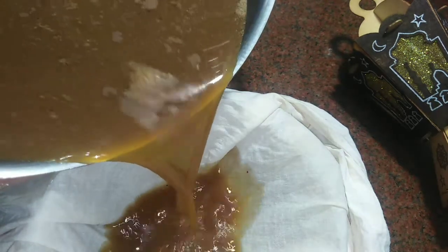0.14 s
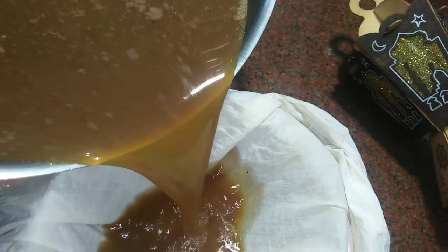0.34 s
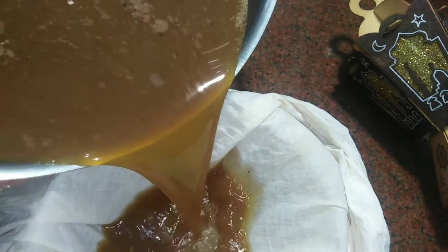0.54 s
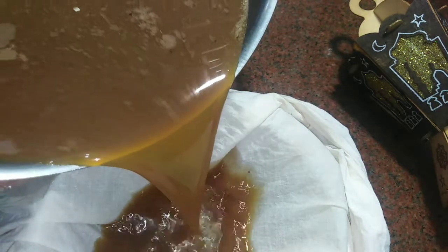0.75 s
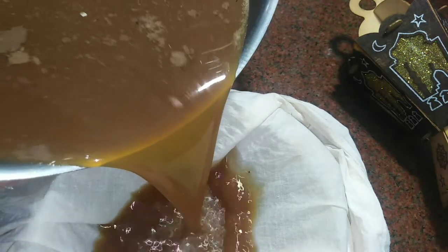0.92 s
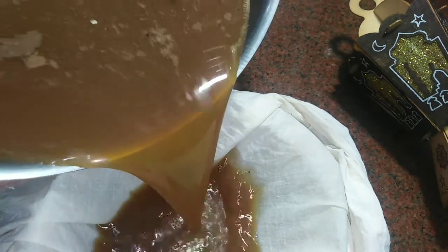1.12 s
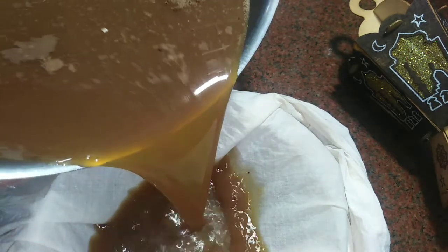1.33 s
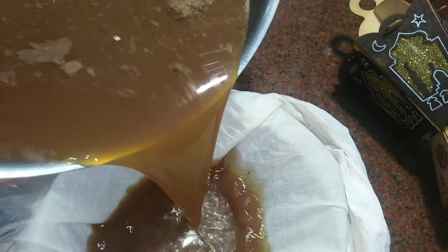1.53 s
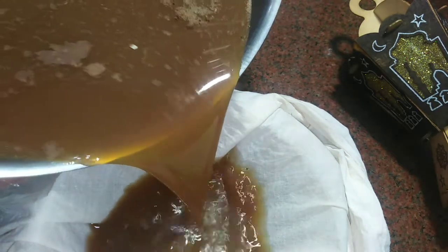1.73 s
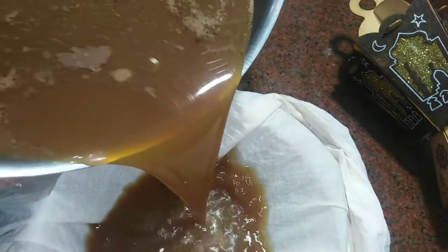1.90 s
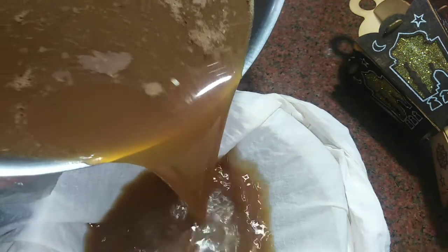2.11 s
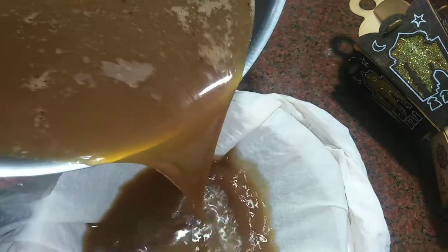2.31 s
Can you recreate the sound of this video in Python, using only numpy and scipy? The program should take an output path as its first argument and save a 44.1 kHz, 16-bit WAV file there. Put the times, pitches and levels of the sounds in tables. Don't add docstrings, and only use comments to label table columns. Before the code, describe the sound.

Syrup splatters brightly onto soaked cloth over a low motor hum, then only tiny drips remain.

```python
import sys
import numpy as np
from scipy import signal
from scipy.fft import rfft, irfft
from scipy.io import wavfile
from scipy.ndimage import uniform_filter1d

SR = 44100
rng = np.random.default_rng(int(sys.argv[2]) if len(sys.argv) > 2 else 0)


def ratio_of_db(decibels):
    return 10 ** (np.asarray(decibels, float) / 20)


def wrap_up_sound(samples):
    columns = np.atleast_2d(samples).T
    tamed = np.clip(columns, -1, 1)
    steps = np.round(tamed * 32767).astype(np.int16)
    wavfile.write(sys.argv[1], SR, steps)


N = 108530

# pitch_hz, level_db (per Hz)
AIR_COLOUR = [(560, -0.5), (800, -8), (1500, -15), (3200, -14.5), (8000, -18.5), (14000, -27.5),
              (15500, -26.5)]
# pitch_hz, likeness (0 to 1)
LIKENESS = [(60, 1), (240, 0.88), (950, 0.41), (3770, 0.074), (15000, 0.2)]
# pitch_hz, left_over_right_db
BASS_BALANCE = [(60, .2), (130, 1.9), (280, -2), (550, 2.3), (1200, .1)]
# start_s, length_s, level_db, pitch_hz
WHISTLES = [
    (.91, .06, -67, 2750),
    (1.065, .095, -68, 2600),
    (1.6, .16, -67, 3050),
    (1.765, .085, -66, 2380),
    (1.9, .15, -66, 2580),
    (2.06, .03, -62, 2300),
    (2.165, .17, -65, 2580),
]
# multiple (of the turning rate), level_db
HUM_LINES = [(4, -45.5), (5, -38.5), (8, -39.5), (10, -43.5), (12, -49.5), (13, -45.5), (16, -43),
             (20, -54.5), (24, -55.5)]
# pitch_hz, level_db (per Hz)
RUMBLE_COLOUR = [(20, -32), (50, -18), (63, -2.5), (100, 0.5), (290, -9), (490, -16.5), (540, -28.5),
                 (620, -37.5)]
# time_s, level_db
SPATTER_VIGOUR = [
    (0, -51),
    (.3, -35),
    (0.421, -44.5),
    (0.512, -33.5),
    (0.619, -74),
    (.9, -56.5),
    (1.05, -87),
    (1.9, -69.5),
    (2.059, -64),
    (2.46, -59.5),
]
# pitch_hz, level_db (per Hz)
SPATTER_COLOUR = [(1290, -46), (2200, -1.5), (7530, -6.5), (10800, -15), (14500, -10)]
# pitch_hz, left_over_right_db
POOL_SIDE = [(900, -10), (2000, -7), (3500, -3), (4600, -.1), (6500, -4)]
# start_s, level_db (peak), pitch_hz
FINE_POPS = [(0.0014, -23, 7530), (0.0115, -15.5, 8960), (0.066, -21, 10300), (0.1143, -18.5, 10760),
             (0.1406, -19, 8660), (0.1454, -23, 11000), (0.162, -26, 12000), (0.2119, -15.5, 11030),
             (0.2379, -23.5, 7810), (0.2494, -23, 7720), (0.2953, -17.5, 12440), (0.3029, -19.5, 7770),
             (0.3149, -19.5, 11020), (0.3304, -29, 7600), (0.348, -25, 11330), (0.379, -28, 8900),
             (0.5029, -23.5, 12120), (0.5117, -28.5, 10600), (0.6594, -27, 12000), (0.7668, -27.5, 10720),
             (0.8801, -22.5, 8210), (0.8914, -28, 11500), (0.9034, -26.5, 10500), (0.9105, -30.5, 12200),
             (0.9682, -29, 9630), (1.5464, -33, 7280), (1.714, -35, 14250), (1.8819, -26, 11400),
             (2.3622, -39, 11200)]
# start_s, level_db (peak), pitch_hz
FAINT_POPS = [
    (0.7417, -40, 11020),
    (0.844, -41.5, 11100),
    (1.0514, -39, 13830),
    (1.2186, -47.5, 13400),
    (1.291, -42, 14000),
    (1.73, -45, 7200),
    (2.0193, -44, 7260),
    (2.2084, -51, 9220),
    (2.2653, -47.5, 7460),
    (2.4544, -38.5, 7570),
]
# time_s, left_over_right_db (at 10 kHz)
BRIGHT_SIDE = [(0, -11), (.5, -12), (.7, -16), (2.4, -22)]
# start_s, level_db (peak), pitch_hz
MID_POPS = [(0.064, -26, 7100), (0.1842, -30, 5340), (0.2308, -31, 5170), (0.2505, -17.5, 6260),
            (0.3803, -29.5, 6150), (0.4773, -34.5, 5500), (0.4973, -27, 6020), (0.5526, -32, 6120),
            (1.1263, -49.5, 6200), (1.1502, -42, 6450), (1.5533, -55, 6050), (1.6228, -41, 5370),
            (1.6702, -36.5, 6100), (1.8407, -44.5, 6100), (1.9584, -41, 5310), (2.0044, -36, 4870),
            (2.3451, -42, 6240), (2.4369, -34, 5970)]
# start_s, level_db (peak), pitch_hz
ROUND_POPS = [(0.0298, -28.5, 3220), (0.143, -43, 3650), (0.2307, -27, 4600), (0.2544, -29, 3260),
              (0.3037, -27, 4180), (0.3483, -31, 2920), (0.4125, -40.5, 3990), (0.487, -34, 4640),
              (0.5202, -37, 3140), (0.72, -49.5, 3740), (0.8555, -45, 4150), (0.8928, -42, 4320),
              (1.6374, -40, 3030), (1.8424, -46.5, 4190), (1.959, -42, 3080), (2.0372, -41.5, 4050),
              (2.0685, -37, 4100), (2.1822, -39.5, 3380), (2.214, -47, 2440), (2.3148, -39.5, 3640),
              (2.373, -36.5, 2820), (2.4073, -40.5, 4430)]
# start_s, level_db (peak), pitch_hz
BIG_POPS = [(0.138, -44, 2170), (0.251, -36, 1800), (0.303, -35, 1604), (0.359, -29, 1268),
            (0.476, -30, 1514), (0.498, -32, 1508), (1.51, -54, 2150), (1.617, -37, 1580),
            (1.658, -42, 1586), (2.196, -43, 2400), (2.371, -46.5, 1980), (2.447, -38.5, 1082)]
# start_s, level_db (peak), pitch_hz
LATE_POP = (2.069, -36, 3100)

RING_ROUGHNESS = 0.49
MOTOR_TILT_DB_PER_S = 2


def rms_one(x):
    return x / np.sqrt(np.mean(x ** 2) + 1e-20)


def at_hz(points, hz):
    table_hz, value = np.transpose(points)
    return np.interp(np.log(hz), np.log(table_hz), value)


def sides(pan_db):
    left = ratio_of_db(np.asarray(pan_db))
    return np.array([2 * left / (1 + left), 2 / (1 + left)])


def drift(rate_hz):
    r = np.exp(-80 * np.pi * rate_hz / SR)
    chance = rng.standard_normal(N // 40 + 2002)
    slow = signal.lfilter([1], [1, -2 * r, r * r], chance)[2000:]
    return np.interp(np.arange(N) / 40, np.arange(len(slow)), rms_one(slow))


def narrow(hz, width_hz):
    r = np.exp(-np.pi * width_hz / SR)
    resonance = [1, -2 * r * np.cos(2 * np.pi * hz / SR), r * r]
    once = signal.lfilter([1], resonance, rng.standard_normal(N + 9000))
    twice = signal.lfilter([1], resonance, once)
    return rms_one(twice[9000:])


def shaped_noise(spectrum, floor_db, patchy_db, rate_hz, count, tilt_db=0):
    hz = np.maximum(np.arange(N // 2 + 1) * SR / N, 1)
    mid, side = rfft(rng.standard_normal((2, N)))
    alike = np.clip(at_hz(LIKENESS, hz), 0, .995)
    both = np.sqrt(1 + alike) * mid + np.sqrt(1 - alike) * side * [[1], [-1]]
    both = both * sides(at_hz(BASS_BALANCE, hz))
    low_hz, high_hz = spectrum[0][0], spectrum[-1][0]
    inside = (hz > low_hz) & (hz < high_hz)
    both = both * ratio_of_db(np.where(inside, at_hz(spectrum, hz), floor_db))
    place = np.clip(np.log(hz / low_hz) / np.log(high_hz / low_hz), 0, 1) * (count - 1)
    out = np.zeros((2, N))
    for k in range(count):
        band = irfft(both * np.clip(1 - abs(place - k), 0, 1), N)
        out += band * ratio_of_db(patchy_db * drift(rate_hz) + tilt_db * (k / count - .5))
    return rms_one(out)


def air():
    return ratio_of_db(-61) * shaped_noise(AIR_COLOUR, floor_db=-50, patchy_db=2.6, rate_hz=15.0, count=18)


def whistles():
    t = np.arange(N) / SR
    out = np.zeros(N)
    for start_s, length_s, db, hz in WHISTLES:
        fade = np.clip(np.minimum(t - start_s, start_s + length_s - t) / .02, 0, 1)
        out += ratio_of_db(db) * narrow(hz, width_hz=40) * fade
    return out * sides(7.4)[:, None]


def motor():
    turning_hz, wobble_db, whine_hz = 20.2, 1.8, 4940
    t = np.arange(N) / SR
    tilt_db = MOTOR_TILT_DB_PER_S * (t - t.mean())
    hum = np.zeros((2, N))
    for k, db in HUM_LINES:
        level_db = db + 0.5 + wobble_db * drift(3.33) + tilt_db * np.log2(k / 7)
        tone = np.sin(2 * np.pi * (k * turning_hz * t + rng.random()))
        hum += ratio_of_db(level_db) * tone * sides(at_hz(BASS_BALANCE, k * turning_hz))[:, None]
    rumble = shaped_noise(RUMBLE_COLOUR, floor_db=-60, patchy_db=1.2, rate_hz=4.0, count=6, tilt_db=2 * tilt_db)
    whine = rms_one(np.sin(2 * np.pi * whine_hz * t) + .22 * narrow(whine_hz, width_hz=12))
    return hum + ratio_of_db(-35) * rumble + ratio_of_db(-62) * whine * sides(16)[:, None]


def kitchen(x):
    t = np.arange(SR // 3) / SR
    noise = rng.standard_normal((2, 2, len(t))) * (t > .0015)
    late = noise[0] * ratio_of_db(-60 * t / .45)
    early = noise[1] * ratio_of_db(-60 * t / .02)
    echo = ratio_of_db(-8.5) * rms_one(late) + ratio_of_db(-5) * rms_one(early)
    blend = .88 * x + .12 * x[::-1]
    return signal.fftconvolve(blend, echo / np.sqrt(len(t)), axes=1)[:, :N]


def pops(start_s, db, hz, pan_db, cycles, size, roughness):
    pitch_rise, swell, left_lag_s = .004, 1.0, 0.0002
    turn = np.arange(size) / SR * hz[:, None]
    shape = turn ** swell * ratio_of_db(-60 * turn / cycles)
    shape = shape / shape.max(axis=1, keepdims=True)
    ragged = uniform_filter1d(rng.standard_normal((len(start_s), size)), size=size // 40)
    ring = shape * np.sin(2 * np.pi * turn * (1 + pitch_rise * turn)) * (1 + roughness * 2 * ragged)
    out = np.zeros((2, N + SR))
    first = (np.clip(start_s - 1 / hz, 0, N / SR) * SR).astype(int)
    where = first[:, None] + np.arange(size)
    left_lag = (left_lag_s * SR + rng.normal(0, 1, (len(start_s), 1))).astype(int)
    for side, gain, lag in zip(out, sides(pan_db), (left_lag, 0)):
        np.add.at(side, where + lag, (gain * ratio_of_db(db))[:, None] * ring)
    return out[:, :N]


def spatter():
    bubbles_per_s, size_spread_db = 320, 5.5
    draw = rng.random((6000, 4))
    start_s = np.cumsum(-np.log(draw[:, 0] + 1e-9)) / bubbles_per_s
    in_time = start_s < N / SR
    draw, start_s = draw[in_time], start_s[in_time]
    hz = 2300 * 6.3 ** draw[:, 1]
    db = at_hz(SPATTER_COLOUR, hz) + 20 * np.log10(hz) - size_spread_db * np.log(draw[:, 2] + .02)
    pan_db = np.where(hz > 7000, -12, at_hz(POOL_SIDE, hz)) + 6 * (draw[:, 3] - .5)
    vigour_db = np.interp(np.arange(N) / SR, *np.transpose(SPATTER_VIGOUR))
    drops = pops(start_s, db, hz, pan_db, cycles=17.0, size=240, roughness=RING_ROUGHNESS)
    return ratio_of_db(vigour_db - 2.0) * rms_one(drops)


def bursts():
    start_s, db, hz = np.transpose(FINE_POPS + FAINT_POPS)
    pan_db = np.interp(start_s, *np.transpose(BRIGHT_SIDE)) - 20 * np.log2(hz / 1e4)
    out = pops(start_s, db, hz, pan_db, cycles=18.0, size=160, roughness=.9)
    for rows, cycles in ((MID_POPS, 28.0), (ROUND_POPS, 26.0), (BIG_POPS, 19.0), ([LATE_POP], 22.0)):
        start_s, db, hz = np.transpose(rows)
        out = out + pops(start_s, db, hz, at_hz(POOL_SIDE, hz), cycles, size=1000, roughness=RING_ROUGHNESS)
    return out


def scene():
    syrup = bursts() + spatter()
    return syrup + kitchen(syrup) + motor() + whistles() + air()


def suppressor(x):
    from_hz, margin_db, floor_db, release, leak_db = 600, 3.6, -13, .8, 14
    hz, _, z = signal.stft(x, SR, nperseg=512, noverlap=384)
    power = uniform_filter1d(np.mean(abs(z) ** 2, axis=0), size=3, axis=0)
    power = np.maximum(power, signal.lfilter([1 - release], [1, -release], power))
    steady = signal.medfilt(np.percentile(power, 20, axis=1), 15)[:, None]
    above_bass = hz[:, None] > from_hz
    opened = np.clip(1 - ratio_of_db(2 * margin_db) * steady / (power + 1e-20), 0, 1) * above_bass
    floor = ratio_of_db(floor_db + leak_db * opened.mean(axis=0))
    gain = np.where(hz[:, None] < from_hz, 1, np.maximum(opened, floor))
    gain = uniform_filter1d(gain, size=3, axis=1)
    return signal.istft(z * gain, SR, nperseg=512, noverlap=384)[1][:, :N]


def roll_off(x):
    return signal.sosfilt(signal.butter(12, 15640, fs=SR, output="sos"), x)


def record(dry):
    top_cut = signal.ellip(6, 1, 32, 14300, fs=SR, output="sos")
    mix = signal.sosfilt(top_cut, suppressor(dry))
    return roll_off(mix)


dry = scene()
out = record(dry)
wrap_up_sound(out)
```